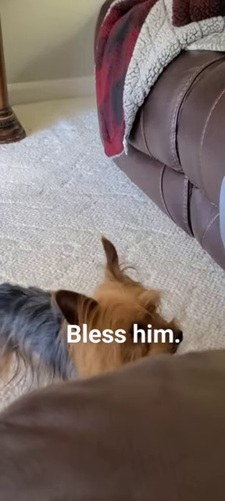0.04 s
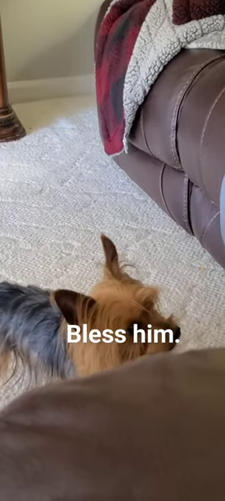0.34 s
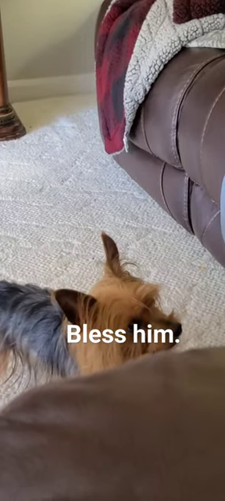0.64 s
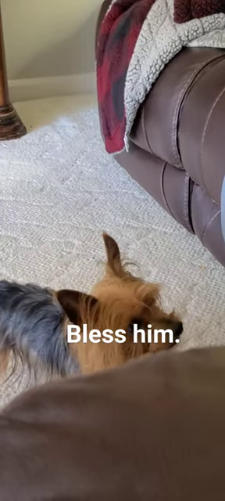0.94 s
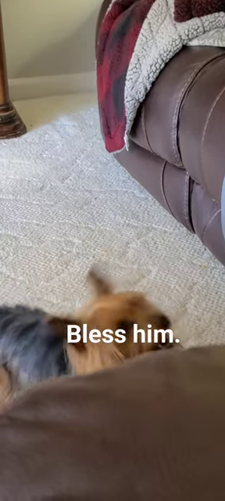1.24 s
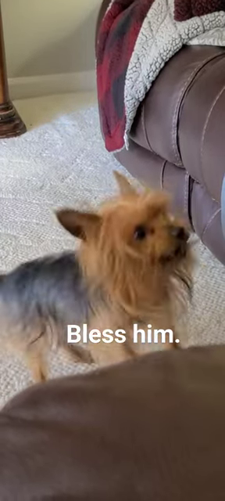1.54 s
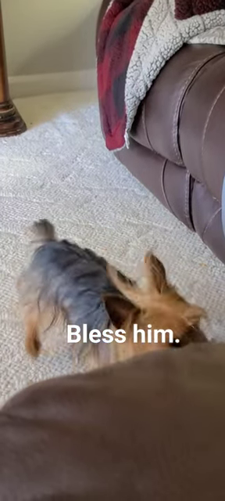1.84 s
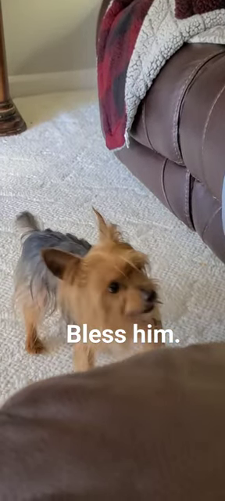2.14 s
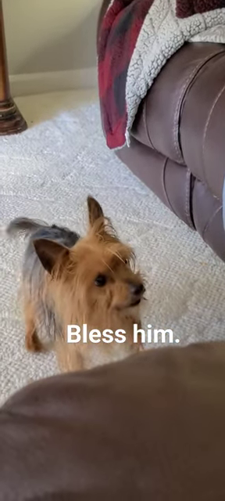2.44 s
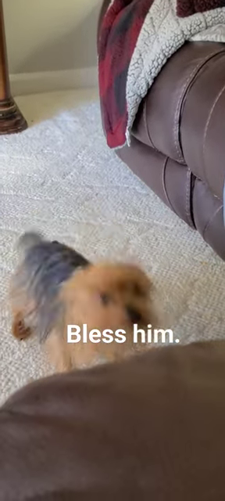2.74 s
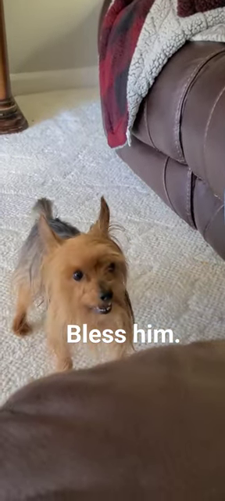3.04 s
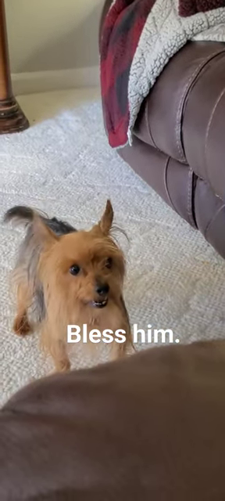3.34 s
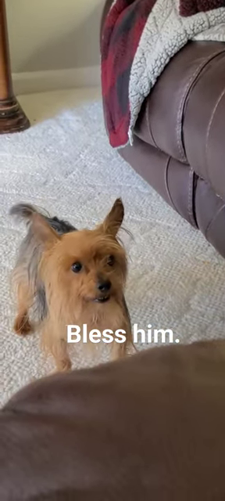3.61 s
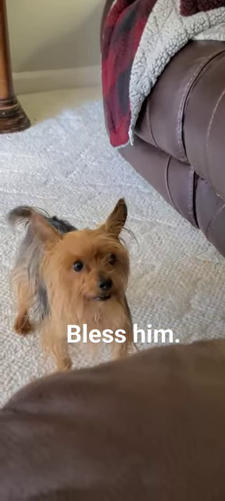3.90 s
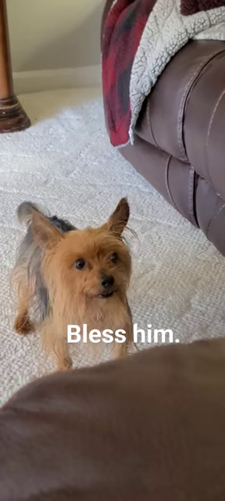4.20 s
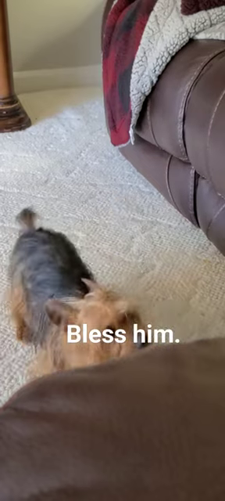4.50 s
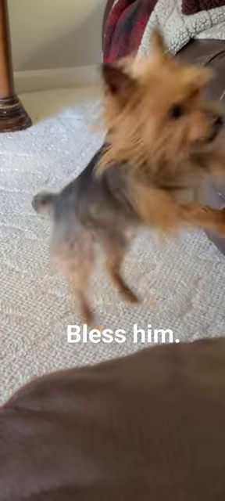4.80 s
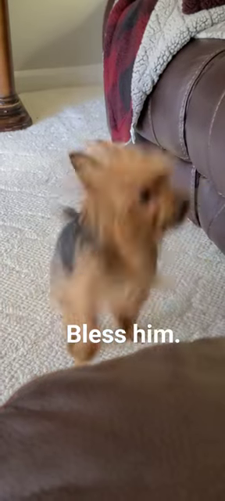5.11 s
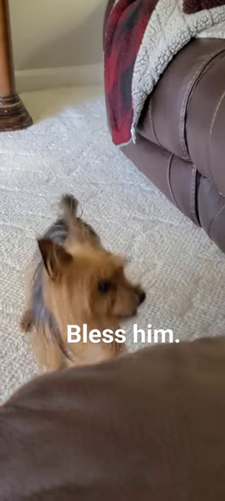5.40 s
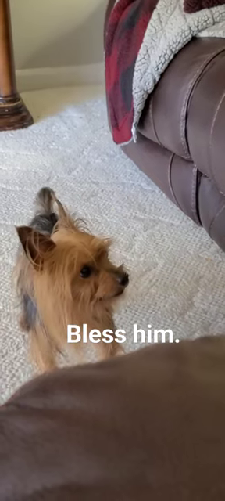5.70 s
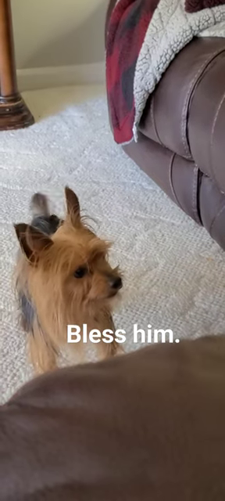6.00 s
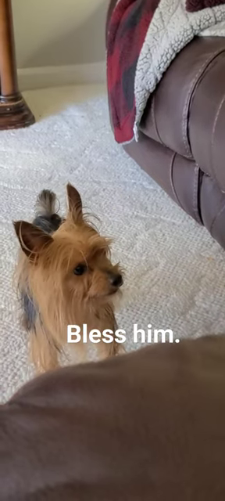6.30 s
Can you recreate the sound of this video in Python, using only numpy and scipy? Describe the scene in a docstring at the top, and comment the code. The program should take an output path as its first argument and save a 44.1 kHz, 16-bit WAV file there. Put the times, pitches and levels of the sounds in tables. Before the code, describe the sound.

Five sharp, high barks from a small terrier indoors, a pair, a single, then another pair, with brief grumbles between.

```python
"""A small terrier barks five times in a carpeted living room, about a metre from a phone's two mics.
Each bark is an arch of pitch from rough vocal folds, ringing a mouth that opens and shuts; air whistles
past the teeth. Low grumbles and sniffs come between, and its paws thud on the carpet as it hops.
Floor, sofa and wall echo the dog, and the room rings briefly over the faint rumble of the house."""
import sys
import numpy as np
from scipy import signal
from scipy.fft import rfft, irfft, next_fast_len
from scipy.io import wavfile
from scipy.ndimage import uniform_filter1d, minimum_filter1d

SR = 44100
rng = np.random.default_rng(int(sys.argv[2]) if len(sys.argv) > 2 else 0)


def transcribe(signal):
    """Save signal, clipped to [-1, 1], as a 16-bit WAV file at the path in sys.argv[1]."""
    frames = np.atleast_2d(signal).T
    limited = np.clip(frames, -1, 1)
    pcm = np.round(limited * 32767).astype(np.int16)
    wavfile.write(sys.argv[1], SR, pcm)


N = 280035
BAND_EDGE_HZ = 15550  # top of the phone's range


def amp(db):
    """Decibels to gain."""
    return 10 ** (np.asarray(db) / 20)


def unit_rms(x):
    """Scales to rms 1."""
    return x / np.sqrt(np.mean(x ** 2) + 1e-20)


def steadied(x, size=700):
    """Holds the short-term rms at 1, leaving the fast grain."""
    return x / np.sqrt(abs(uniform_filter1d(uniform_filter1d(x ** 2, size), size)) + 1e-12)


def ease(u):
    """Smooth step from 0 to 1."""
    return (1 - np.cos(np.pi * np.clip(u, 0, 1))) / 2


def curve_at(points, hz):
    """Reads a table on a log-frequency axis."""
    freqs, values = np.transpose(points)
    return np.interp(np.log(hz + 1), np.log(freqs + 1), values)


def coloured(x, points, size=2048):
    """Causal filter with the given spectrum."""
    log_gain = np.log(amp(curve_at(points, abs(np.fft.fftfreq(size, 1 / SR)))))
    taps = np.fft.ifft(np.exp(np.conj(signal.hilbert(log_gain)))).real
    return signal.oaconvolve(x, taps)[:len(x)]


def butter(x, hz, kind, order=2):
    """Butterworth low- or high-pass."""
    return signal.sosfilt(signal.butter(order, hz, kind, fs=SR, output="sos"), x)


def resonate(x, hz, width_hz):
    """A resonance at hz, which may be fixed or glide."""
    carrier = np.exp(2j * np.pi * np.cumsum(hz * np.ones(len(x))) / SR)
    pole = np.exp(-np.pi * width_hz / SR)
    return 2 * (carrier * signal.lfilter([1 - pole], [1, -pole], x / carrier + 1e-18)).real


def band(x, hz, width_hz):
    """Two like resonances in series."""
    return resonate(resonate(x, hz, width_hz), hz, width_hz)


def noise(count):
    """White noise of up to a second."""
    return rng.standard_normal(SR)[:count]


def wobble(count, hz):
    """Random wandering of rms 1, mostly slower than hz."""
    return unit_rms(butter(noise(count), hz, "low"))


def noise_pair(count, likeness):
    """White noise at the two mics, alike by the given amount at each frequency."""
    left, other = rfft(rng.standard_normal((2, count)))
    same = np.clip(curve_at(likeness, np.fft.rfftfreq(count, 1 / SR)), -1, 1)
    return irfft(np.array([left, same * left + np.sqrt(1 - same ** 2) * other]), count)


# room tone at the phone: (frequency [Hz], relative level [dB])
TONE_SPECTRUM = [(15, -34.5), (25, -12.5), (55, -4), (104, -7), (136, -13), (169, -8.5), (227, -13),
                 (340, -16), (826, -26), (1850, -30), (2300, -38.5), (2490, -32.5), (5280, -40.5),
                 (8130, -52.5), (15500, -52)]
# its likeness between the mics: (frequency [Hz], correlation [-1..1])
TONE_LIKENESS = [(60, 0.96), (150, 0.94), (380, 0.83), (950, 0.16), (2380, 0.07), (5980, 0.02),
                 (15000, -0.02)]


def room_tone(level_db=-62.5):
    """The house rumbles alike at both mics, under a faint, wide hiss."""
    spectrum = amp(curve_at(TONE_SPECTRUM, np.fft.rfftfreq(N, 1 / SR)))
    return amp(level_db) * unit_rms(irfft(rfft(noise_pair(N, TONE_LIKENESS)) * spectrum, N))


# paws on the carpet: (time [s], level [dB], centre [Hz], width [Hz], rise [s])
PAW_FALLS = [(0.51, -57, 79, 60, 0.015), (0.567, -59.5, 69.4, 60, 0.016), (2.042, -56, 149.1, 215.4, 0.023),
             (2.102, -56, 170, 200, .02), (2.15, -58.5, 320.2, 260, 0.037),
             (2.224, -56.5, 136.8, 89.7, 0.015), (4.63, -45.5, 248, 110, 0.033),
             (5.06, -59, 50.6, 45.87, .02), (5.329, -72, 67.5, 69.6, 0.016)]


def paw(level_db, hz, width_hz, rise_s):
    """A paw lands or scuffs on the carpet: a soft, dull swell of noise."""
    age = np.arange(SR // 4) / SR / rise_s
    return amp(level_db) * unit_rms(band(noise(len(age)), hz, width_hz)) * age * np.exp(1 - age)


def vocal_folds(cycles, hz, rough, puff_cycles=.31):
    """Strained folds beat strong and weak in turn, each pulse letting out a puff of air."""
    beat = 1 + rough * (.45 * wobble(len(hz), 300) + .45 * np.cos(np.pi * cycles))
    harmonics = sum(np.cos(2 * np.pi * k * cycles) * (k * hz < BAND_EDGE_HZ) for k in range(2, 40))
    puffs = (.4 + np.exp(-(cycles % 1) / puff_cycles)) * noise(len(hz))
    return (1 - rough) * unit_rms(beat * harmonics) + rough * unit_rms(puffs)


def jaw(t, open_hz, held_s, closing_s, opening_s=.03, ajar=.72, shut_hz=585):
    """The mouth's resonance snaps up from ajar, holds, and settles as the jaw shuts."""
    opening = ajar + (1 - ajar) * np.sin(np.pi / 2 * np.minimum(t / opening_s, 1))
    return shut_hz + (open_hz * opening - shut_hz) * np.exp(-np.maximum(t - held_s, 0) / closing_s)


def mouth_ring(drive, mouth_hz, whistling, waver=.025):
    """The folds ring the mouth; at full effort a whistle locks to its resonance."""
    ring = resonate(resonate(drive, mouth_hz, width_hz=520), mouth_hz, width_hz=300)
    ring = steadied(butter(ring, 540, "high", order=8))
    whistle_hz = mouth_hz * (1 + waver * wobble(len(drive), 150))
    whistle = np.sqrt(2) * np.sin(2 * np.pi * np.cumsum(whistle_hz) / SR)
    return np.sqrt(1 - whistling) * ring + np.sqrt(whistling) * whistle


# second resonance of the throat: (frequency [Hz], relative level [dB])
THROAT_SPECTRUM = [(900, -52), (1300, -5.5), (1550, -3.5), (1800, 4), (2000, 0), (2200, -13), (2600, -17.5),
                   (4000, -53.5)]


def throat_ring(drive):
    """The folds ring the throat, above the mouth's resonance."""
    return steadied(coloured(drive, THROAT_SPECTRUM))


# upper resonances of the muzzle: (centre [Hz], width [Hz], relative level [dB])
MUZZLE_MODES = [(2380, 460, 16), (2940, 770, 7), (3520, 120, -22), (4933, 550, -2.5), (5720, 430, -3),
                (7630, 1300, -12), (8300, 400, -31.5), (10300, 3700, -10.5), (12195, 210, -3.5),
                (14730, 1200, -14.5)]


def muzzle_rasp(drive, nasal):
    """The folds and air rushing past the teeth ring the muzzle; the nasal passage cuts a notch."""
    airy = drive + .7 * butter(noise(len(drive)), 4200, "high")
    rasp = sum((-1) ** k * amp(db) * resonate(airy, hz, width_hz)
               for k, (hz, width_hz, db) in enumerate(MUZZLE_MODES))
    notched = rasp - nasal * resonate(rasp, hz=3900, width_hz=600)
    return steadied(butter(notched, 1900, "high", order=4))


def yelp_gain(progress, hz, level_db, yelp_hz=730, width_hz=120):
    """A fundamental near yelp_hz rings out as a yelp that builds late in the bark, then fades."""
    swell_db = np.interp(progress, [0, .67, 1], [-16, 0, -21.5])
    return amp(level_db + swell_db) * np.exp(-((hz - yelp_hz) / width_hz) ** 2)


# barks, a metre from the phone: (time [s], length [s], attack [s], release [s],
#   base levels of mouth [dB], throat [dB], rasp [dB], fundamental [dB], yelp [dB],
#   first pitch [Hz], top pitch [Hz], last pitch [Hz], climb [s], sink [s],
#   open mouth [Hz], jaw held [s], jaw closing [s],
#   roughness in the climb [0..1], roughness after it [0..1], whistle share [0..1])
TERRIER_BARKS = [ (1.288, .146, 0.031, 0.033, -8, -18.5, -28.5, -34.5, -27, 231.1, 530, 299.2, .040, .088, 1078, .078, 0.018, 0.4, 0.49, 0.2),
                 (1.614, .140, 0.039, 0.032, -11, -21.5, -29, -41.5, -15, 240.6, 567.6, 288.7, .048, .075, 1152, .074, 0.023, 0.75, 0.65, .4),
                 (2.686, 0.13, 0.029, 0.034, -10, -16, -26, -36.5, -35.5, 219.5, 479.1, 305, .055, 0.083, 1080, .054, 0.03, .65, 0.69, 0.43),
                 (4.316, 0.16, 0.0084, 0.083, -11, -18.5, -22.5, -49, -13, 449.3, 776.6, 631, .052, .058, 1184, .034, .085, 0.2, 0.68, 1),
                 (4.944, .214, 0.058, 0.11, -13.5, -19, -22.5, -32, -20.5, 194.7, 784.1, 244.7, .092, .104, 1167, 0.14, 0.022, .15, 0.46, 0.87)]


def bark(length, attack_s, release_s, mouth_db, throat_db, rasp_db, fundamental_db, yelp_db,
         first_hz, top_hz, last_hz, climb_s, sink_s, open_hz, held_s, closing_s,
         climb_rough, top_rough, whistle_share):
    """One push of air and one arch of pitch drive the folds, mouth, throat and muzzle."""
    drift, jitter_cycles, flutter_depth = .012, .042, .63
    mouth_sag_db_per_s, fundamental_sag_db_per_s = 117.5, 30.5  # as the air runs out
    throat_lag_s, whistle_lag_s, chest_hz = .0023, .016, 280
    t = np.arange(0, length, 1 / SR)
    count = len(t)

    # the pitch climbs, holds and sinks; each pulse comes slightly early or late
    sinking = np.maximum(1 + (t - length) / sink_s, 0) ** 1.2
    hz = first_hz + (top_hz - first_hz) * ease(t / climb_s) + (last_hz - top_hz) * ease(sinking)
    rough = climb_rough + (top_rough - climb_rough) * ease(2 * t / climb_s - 1)
    cycles = np.cumsum(hz * (1 + drift * wobble(count, 70))) / SR
    cycles += jitter_cycles * rough * wobble(count, 200)
    drive = vocal_folds(cycles, hz, rough)

    # the whistle peaks after the attack; a slow attack draws it out
    off_peak = (t - attack_s - whistle_lag_s) / (.0069 + .3 * attack_s)
    whistling = np.maximum(whistle_share * np.exp(-off_peak ** 2), .15)
    mouth = mouth_ring(drive, jaw(t, open_hz, held_s, closing_s), whistling)
    # at low pitch the voice is nasal and the slack folds flutter
    slack = np.clip((700 - hz) / 120, 0, 1)
    rasp = muzzle_rasp(drive, slack)
    flutter = 1 + flutter_depth * slack * wobble(count, 160)
    fundamental = np.sqrt(2) * flutter * np.sin(2 * np.pi * cycles)

    # onset falls from 1 to 0 over the attack; release rises from 0 to 1 at the end
    onset = np.maximum(1 - t / attack_s, 0) ** 1.3
    throat_onset = np.maximum(1 - t / (attack_s + throat_lag_s), 0) ** 1.3
    release = np.maximum(1 + (t - length) / release_s, 0)
    octaves_down = np.log2(top_hz / hz)
    sag_db = mouth_sag_db_per_s * np.maximum(t - attack_s, 0)
    mouth_gain = amp(mouth_db - 30.5 * onset - sag_db - 9 * release ** 2)
    throat_gain = amp(throat_db - 34.5 * throat_onset - 6 * octaves_down - 10 * release)
    rasp_gain = amp(rasp_db - 34.5 * onset - 4 * octaves_down - 22 * release)
    # the fundamental leads the overtones, and radiates less below chest_hz
    low_gain = amp(fundamental_db + 2.5 * onset - fundamental_sag_db_per_s * t - 3.5 * release)
    low_gain *= ease(t / (.45 * attack_s)) * amp(10.5 * np.minimum(np.log2(hz / chest_hz), 0))
    low_gain += yelp_gain(t / length, hz, yelp_db)

    voice = low_gain * fundamental + mouth_gain * mouth
    voice += throat_gain * throat_ring(drive) + rasp_gain * rasp
    # so small a mouth radiates no bass
    return butter(voice * signal.windows.tukey(count, .03), 120, "high", order=4)


# hiss at the teeth during barks: (time [s], length [s], level [dB], centre [Hz])
TEETH_HISSES = [(1.293, 0.051, -34.5, 4900), (1.698, 0.037, -38, 4870), (4.31, 0.072, -30, 3850),
                (5.006, 0.023, -26, 6720)]


def teeth_hiss(length, level_db, hz, width_hz=950):
    """Air whistles past the teeth in a short, narrow hiss."""
    count = int(length * SR)
    return amp(level_db) * unit_rms(band(noise(count), hz, width_hz)) * signal.windows.tukey(count, .9)


# low grumbles round the barks: (time [s], length [s], level [dB], first pitch [Hz], last pitch [Hz])
LOW_GRUMBLES = [(1.515, 0.073, -37.5, 192.3, 152.3), (1.587, .055, -30, 184.5, 252.8),
                (2.818, 0.07, -40, 310, 127.4), (4.497, 0.068, -38, 258.5, 196),
                (4.580, 0.095, -40, 170, 135.6), (4.695, 0.045, -51, 129, 124),
                (5.140, 0.065, -47, 226, 138), (5.255, 0.064, -54.5, 211, 179),
                (5.478, 0.037, -51, 184, 162)]


def grumble(length, level_db, first_hz, last_hz, jitter=.075):
    """Slack folds behind a shut mouth: a ragged fundamental and a few weak overtones."""
    progress = np.arange(0, length, 1 / SR) / length
    count = len(progress)
    hz = first_hz * (last_hz / first_hz) ** progress
    phase = 2 * np.pi * np.cumsum(hz * (1 + jitter * wobble(count, 90))) / SR
    overtones = sum(amp(-11 - 8 * k) * np.sin((k + 2) * phase) for k in range(5))
    flutter = 1 + .45 * wobble(count, 80)
    voice = unit_rms((np.sin(phase) + overtones) * flutter)
    swell = amp(level_db + np.interp(progress, [0, .33, 1], [-8.5, 0, -15]))
    return butter(swell * voice * signal.windows.tukey(count, .2), 110, "high", order=4)


# sniffs, faint at a metre: (time [s], length [s], level [dB], centre [Hz])
NOSE_SNIFFS = [(1.861, 0.17, -60.5, 4200), (3.012, 0.31, -69.5, 4100), (5.475, 0.11, -70, 4070),
               (6.052, .07, -77, 5000)]


def sniff(length, level_db, hz, width_hz=2200):
    """A swell of air hisses in the nostrils."""
    count = int(length * SR)
    hiss = butter(band(noise(count), hz, width_hz), 5700, "low", order=3)
    return amp(level_db) * unit_rms(hiss) * signal.windows.tukey(count, .8)


# first echoes off floor, sofa and wall: (left delay [s], right delay [s], gain [ratio])
NEAR_ECHOES = [(.0021, 0.0012, -0.043), (.0047, .0042, -0.13), (.0083, .0089, .22), (0.0109, 0.026, 0.29)]
# tone of the shaded right mic: (frequency [Hz], gain [dB])
RIGHT_MIC_SHADE = [(300, 1), (1100, 0), (2200, 4.5), (4400, -10), (8000, -12.5), (15000, -15)]


def near_paths(dog, right_lag_s=.00017, gain_db=1.5):
    """The straight path reaches the left mic first; near surfaces echo it."""
    size = next_fast_len(N + SR // 10)
    phase_per_s = -2j * np.pi * np.fft.rfftfreq(size, 1 / SR)
    to_left = 1 + sum(gain * np.exp(phase_per_s * s) for s, _, gain in NEAR_ECHOES)
    to_right = np.exp(phase_per_s * right_lag_s)
    to_right += sum(gain * np.exp(phase_per_s * s) for _, s, gain in NEAR_ECHOES)
    left, right = irfft(rfft(dog, size) * np.array([to_left, to_right]), size)[:, :N]
    return amp(gain_db) * np.array([left, coloured(right, RIGHT_MIC_SHADE)])


# ring of the living room: (frequency [Hz], time to fall 60 dB [s])
RING_DECAY = [(150, 0.58), (500, .45), (1100, 0.76), (2000, 0.68), (4000, 0.67), (5200, 0.47), (7000, 0.17),
              (14000, 0.3)]
# its colour at the phone: (frequency [Hz], gain [dB])
RING_COLOUR = [(150, 5), (450, 2), (700, -4), (900, -7.5), (1120, -4.5), (1400, -2), (1850, -3), (3000, -6),
               (5000, -5), (8000, 1.5), (15000, -5)]
# its likeness between the mics: (frequency [Hz], correlation [-1..1])
RING_LIKENESS = [(160, 1), (230, .96), (350, .8), (700, .4), (1300, -.1), (2200, -.3), (5000, 0)]


def room_ring(dog, early_db=-6, late_db=-10, note_db=-30, early_t60_s=.14, note_t60_s=.67,
              gap_s=.0099, build_s=.0027):
    """Dense echoes among the furniture die fast; the whole room rings longer, with one faint note."""
    hz, frame_s, frames = signal.stft(noise_pair(SR, RING_LIKENESS), SR, nperseg=256)
    decay = amp(-60 * frame_s / curve_at(RING_DECAY, hz)[:, None])
    late = signal.istft(frames * decay, SR, nperseg=256)[1][:, :SR]
    t = np.arange(SR) / SR
    early = noise_pair(SR, RING_LIKENESS) * amp(-60 * t / early_t60_s)
    note = np.array([band(mic, hz=1145, width_hz=70) for mic in noise_pair(SR, RING_LIKENESS)])
    note *= amp(-60 * t / note_t60_s)
    onset = np.clip((t - gap_s) / build_s, 0, 1)
    tail = sum(amp(db) * unit_rms(part * onset)
               for db, part in [(early_db, early), (late_db, late), (note_db, note)])
    return signal.fftconvolve(coloured(dog, RING_COLOUR)[None], tail / np.sqrt(SR), axes=1)[:, :N]


def scene():
    """The dog's paws, voice and nose, heard from a metre away over the room tone."""
    dog = np.zeros(N)
    for source, events in [(paw, PAW_FALLS), (bark, TERRIER_BARKS), (teeth_hiss, TEETH_HISSES),
                           (grumble, LOW_GRUMBLES), (sniff, NOSE_SNIFFS)]:
        for start_s, *settings in events:
            start = round(start_s * SR)
            sound = source(*settings)[:N - start]
            dog[start:start + len(sound)] += sound
    return near_paths(dog) + room_ring(dog) + room_tone()


def record(dry, ceiling=.97, window=265):
    """The phone eases its gain down round any peak over the ceiling, then limits the band."""
    allowed_gain = np.minimum(1, ceiling / (abs(dry).max(0) + 1e-9))
    limited = dry * uniform_filter1d(minimum_filter1d(allowed_gain, window), window)
    low_pass = signal.firwin(511, BAND_EDGE_HZ, window=("kaiser", 9), fs=SR)
    return signal.oaconvolve(limited, low_pass[None], "same")


dry = scene()
out = record(dry)
transcribe(out)
```